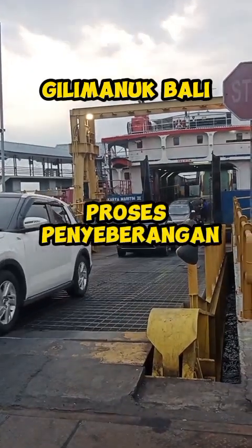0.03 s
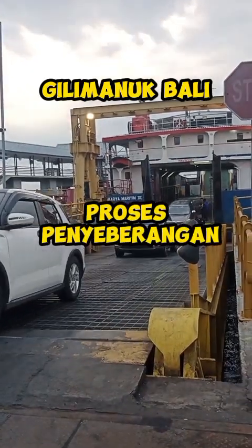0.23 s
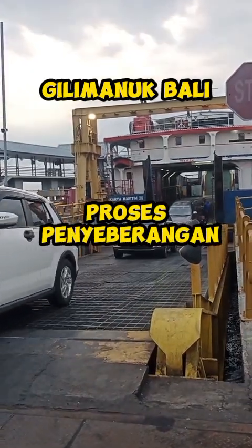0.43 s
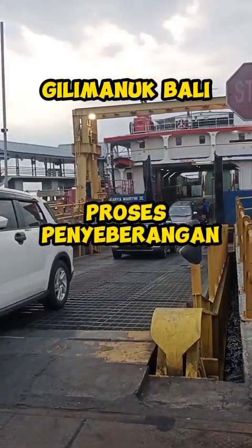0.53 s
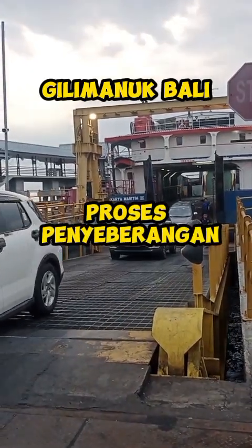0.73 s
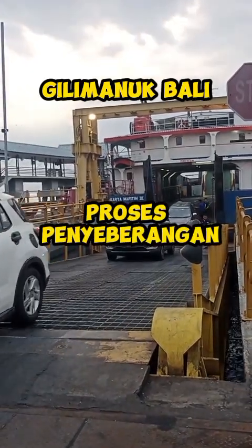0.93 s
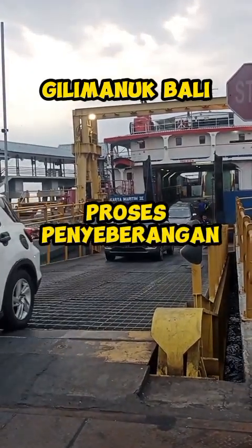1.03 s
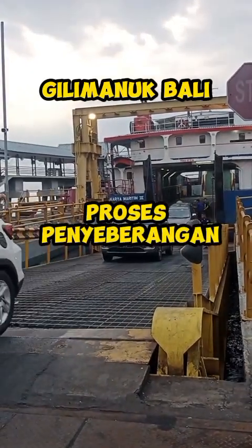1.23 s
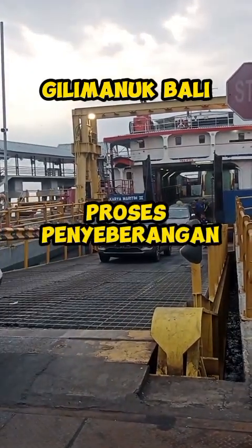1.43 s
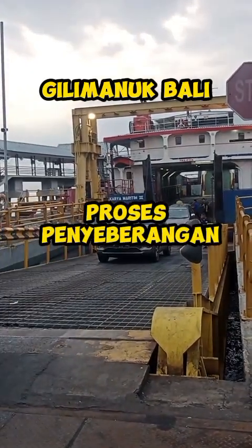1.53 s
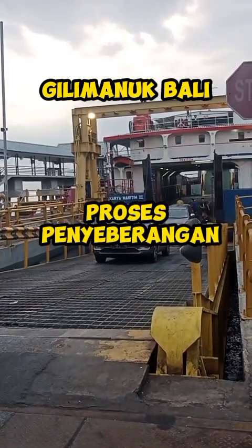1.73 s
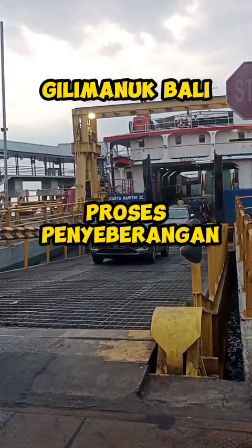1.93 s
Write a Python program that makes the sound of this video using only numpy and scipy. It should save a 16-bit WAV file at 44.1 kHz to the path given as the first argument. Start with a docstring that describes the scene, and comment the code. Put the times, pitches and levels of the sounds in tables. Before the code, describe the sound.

A car rolls slowly off a steel ramp close by, its tyres thumping over droning, rattling grating. At about 0.2 seconds, after a tiny rubber squeak, the front wheel slams a loose metal flap, which clatters and rings until about 0.6 seconds. The rear wheel slams it again from 1.3 to 1.6 seconds, then the last thumps pass. Engines rumble low throughout, with a few faint high tinkles.

```python
"""A car rolls slowly off a steel ferry ramp, over a low rumble of engines. From the start the deck
drones, its grating shivers, the loose end flap knocks under the load and the tyres thump over the bars.
Near 0.2 s rubber squeaks and the front wheel slams the flap, which clatters, rings, grinds on grit and
drops back. From 0.5 s there are faint, brief high tinkles. Near 1.3 s, after more squeaks, the rear
wheel slams the flap in turn, and its modes decay while the last thumps pass."""
import sys
import numpy as np
from scipy import signal
from scipy.io import wavfile

SR = 44100
rng = np.random.default_rng(int(sys.argv[2]) if len(sys.argv) > 2 else 0)


def to_wav(s):
    """Save 16-bit WAV."""
    ch = np.atleast_2d(s).T  # columns
    pcm = np.round(np.clip(ch, -1, 1) * 32767)  # PCM
    wavfile.write(sys.argv[1], SR, pcm.astype(np.int16))


N = 88200
TIME = np.arange(N) / SR

# Levels are relative to each source's gain. T60 is the time to decay by 60 dB.
# spectral density of the engines and far harbour: f/Hz, level/dB
RUMBLE_SPECTRUM = [(25, -33), (45, -38), (65, -15), (100, -12), (160, -6), (330, -10.5), (450, -26),
                   (750, -32.5), (1300, -30), (2000, -31.5), (2500, -24.5), (3500, -40.5), (4900, -47),
                   (6000, -65.5), (7200, -31), (8300, -49), (10000, -61), (15000, -60)]
# envelope of the deck's drone: t/s, level/dB
DRONE_ENVELOPE = [(0, -6.5), (.11, 3), (.3, 4.5), (.56, 1), (.72, -7.5), (.85, -5.5), (.9, -16), (.96, -15),
                  (1.04, -9), (1.09, -11.5), (1.13, -3), (1.26, -5.5), (1.6, 2), (1.72, -5.5), (1.85, -4),
                  (2, -14)]
# spectral density of that drone: f/Hz, level/dB
DRONE_SPECTRUM = [(50, -19), (110, -1), (230, -2), (340, -3),
                  (430, -12), (540, -16.5), (750, -33), (1500, -66)]
# envelope of the grating's vibration: t/s, level/dB
SHIVER_ENVELOPE = [(0, -2.5), (.11, -5.5), (.16, 11), (.3, 15.5), (.55, 3.5), (.62, -2), (.7, 2.5),
                   (.85, -2.5), (.93, -13.5), (1.09, -7), (1.16, -2.5), (1.27, 3), (1.6, -10),
                   (1.75, -15.5), (2, -9)]
# resonances of the grating: f/Hz, bandwidth/Hz, level/dB
GRATING_MODES = [(1076, 60, -4.5), (1207, 97, -1), (1335, 95, 3.5), (1766, 130, -2), (1893, 69, -0.5),
                 (2350, 270, 2.5), (2617, 98, -0.5), (2824, 220, -3), (3450, 200, -14), (5740, 280, -26.5),
                 (6740, 200, -17), (7230, 260, -12.5), (8030, 220, -18)]
# dull knocks as the flap takes up the load: t/s, level/dB
FLAP_KNOCKS = [(0.0, -28), (0.046, -25), (0.097, -29), (0.126, -30.5), (1.118, -47)]
# spectral density of a knock: f/Hz, level/dB
KNOCK_SPECTRUM = [(100, -19), (250, -6.5), (550, 5), (750, -28), (1200, -9), (2500, -21), (5000, -52)]
# blows of the slammed flap: t/s, level/dB, extra bass/dB, extra treble/dB
FLAP_BLOWS = [(0.179, -14.5, 0, -3.5), (0.187, -12.5, 1, -20), (0.203, -13.5, 7.5, -5), (0.222, -22, 2, 9),
              (0.236, -20.5, 12, 13), (0.261, -24.5, 6, 10.5), (0.328, -26.5, 17, 6.5),
              (0.355, -18.5, 3, 2), (0.378, -23, 12, 3), (0.397, -26.5, 15.5, -23), (0.424, -25, -6, -4),
              (0.446, -28, -14, 1), (1.289, -17, 0, -6), (1.299, -18.5, 7, 0), (1.328, -22.5, 15, 8),
              (1.352, -18, 7, 8.5), (1.359, -16, 4.5, 1), (1.377, -15.5, 5, -7), (1.392, -29, 9, -17),
              (1.449, -24.5, 0, 1), (1.458, -20, -7, -0.5), (1.469, -16.5, 3, 3.5), (1.481, -21, 2, 7),
              (1.510, -35.5, 25, -22), (1.539, -30, -5, 2)]
# time for a blow to spread through the plate: f/Hz, time constant/s
BLOW_RISE = [(200, 0.0017), (1000, 0.0021), (2800, 0.0012), (7000, 0.0021), (12000, 0.0027)]
# the quick crash of a blow, relative to the long ring: f/Hz, level/dB
CRASH_SPECTRUM = [(200, -8), (1200, 6.5), (3000, 4.5), (7000, 9), (12000, 1.5)]
# decay of that crash: f/Hz, T60/s
CRASH_DECAY = [(200, 0.3), (2500, 0.17), (7000, 0.15), (12000, .1)]
# spectral density of the plate's long, dense ring: f/Hz, level/dB
PLATE_SPECTRUM = [(60, -46), (130, -7.5), (260, -1.5), (480, 4), (720, -8.5), (1100, 2), (1500, -3.5),
                  (1850, 0.5), (2500, -4), (2900, -7.5), (3400, -12.5), (4200, -20), (4900, -26.5),
                  (6200, -25), (8200, -27), (10000, -20.5), (15000, -24.5)]
# decay of that ring: f/Hz, T60/s
PLATE_DECAY = [(100, 0.33), (450, 0.47), (1200, 0.52), (2600, 0.35), (4500, 0.23), (7500, 0.3),
               (11000, 0.061)]
# a tyre drops between two bars: t/s, level/dB
TYRE_DROPS = [(0.046, -23.5), (0.099, -19.5), (0.187, -21.5), (0.246, -22), (0.302, -25), (0.347, -22),
              (0.398, -14.5), (0.418, -21.5), (0.475, -22.5), (0.541, -16.5), (0.608, -24), (0.679, -21),
              (0.772, -25), (0.830, -21.5), (0.883, -32.5), (1.007, -25), (1.044, -31), (1.119, -20),
              (1.200, -22.5), (1.270, -20.5), (1.309, -37), (1.37, -21.5), (1.427, -22), (1.472, -18),
              (1.528, -20), (1.570, -18.5), (1.641, -40), (1.717, -20), (1.856, -24), (1.92, -33.5)]
# modes of tyre and deck: f/Hz, level/dB, T60/s
TYRE_MODES = [(70.2, -13.5, 0.3), (105.5, 4, 0.11), (126, -4.5, 0.12), (165.6, -18.5, 0.17),
              (209.2, -11.5, 0.13), (246, -9, 0.12), (337.6, -17, 0.27)]
# rubber slips on the bars before each slam: t/s, Gaussian width/s, f/Hz, level/dB
RUBBER_SLIPS = [(0.145, 0.0089, 1950, -31), (0.158, 0.01, 1600, -35.5), (1.170, 0.0077, 1900, -38),
                (1.229, 0.0041, 2590, -35.5), (1.267, 0.011, 1780, -36)]
# strong modes of the flap: f/Hz, level under front wheel/dB, level under rear wheel/dB, T60/s
FLAP_MODES = [(249.8, -14, -29.5, 0.37), (281.4, -22, -16, 0.63), (373.4, -13.5, -9, 0.38),
              (453, -10, -9, 0.42), (492, -9.5, -21, 0.3), (529.6, -27.5, -15, 0.49),
              (571.5, -11, -18, 0.64), (864, -14, -33, 0.18), (921, -12.5, -14, 0.32),
              (1080, -14.5, -22, .45), (1238, -7.5, -16, .45), (1391, -13.5, -21.5, 0.68),
              (1404, -13.5, -24, 0.73), (1634, -23, -17, 0.26), (1782, -9.5, -16, 0.23),
              (1798, -11.5, -9, 0.5), (1903, -14, -38, 0.27), (2270, -26, -19, 0.22),
              (2441, -9.5, -7, 0.24)]
# steel presses on gritty steel as the flap lands: t/s, Gaussian width/s, level/dB
GRIND_BURSTS = [(0.198, 0.0067, -33.5), (0.23, 0.013, -38.5), (0.26, 0.0042, -25), (0.377, .005, -34),
                (1.311, 0.01, -40), (1.361, .006, -31), (1.463, 0.0044, -47), (1.488, 0.0028, -42),
                (1.552, 0.018, -47)]
# modes of the steel edge: f/Hz, level/dB
EDGE_MODES = [(3300, -3), (3900, -13), (5700, -9), (6300, -0.5), (7300, 1.5), (7900, 0), (8400, -3.5),
              (9800, 2), (11000, 1.5), (11900, 2), (13200, 0), (15000, 0.5)]
# faint, brief tinkles near 3-4 kHz: t/s, f/Hz, level/dB
HIGH_TINKLES = [(0.510, 4310, -42.5), (0.930, 3710, -53), (1.100, 3850, -53.5), (1.130, 2966, -43.5),
                (1.235, 4000, -52), (1.820, 3860, -57), (1.945, 3640, -57.5)]


def from_db(db):
    """Amplitude ratio of a level in decibels."""
    return 10 ** (np.asarray(db) / 20)


def at_hz(points, hz):
    """Interpolation on a logarithmic frequency axis."""
    f, value = np.transpose(points)
    return np.interp(np.log(hz), np.log(f), value)


def in_time(points):
    """Linear interpolation of an envelope at every sample."""
    return np.interp(TIME, *np.transpose(points))


def flutter(rate):
    """Random modulation: unit normal values, rate per second, joined by straight lines."""
    return np.interp(TIME * rate, np.arange(2000), rng.standard_normal(2000))


def pulse(centre, width):
    """Gaussian envelope of unit height."""
    return np.exp(-.5 * ((TIME - centre) / width) ** 2)


def noise_bands():
    """White noise resolved into quarter octaves of equal spectral density: centre f/Hz, signal."""
    edges = 25 * 2 ** (np.arange(39) / 4)
    white = rng.standard_normal((2, N + SR // 2)) * np.sqrt(SR / 2)
    for k, (low, high) in enumerate(zip(edges, edges[1:])):
        sos = signal.butter(3, [low, high], "band", fs=SR, output="sos")
        yield np.sqrt(low * high), signal.sosfilt(sos, white[k % 2])[-N:]


def narrow_noise(hz, width):
    """Response of a resonance to random excitation, at unit rms."""
    sos = signal.butter(2, [hz - width / 2, hz + width / 2], "band", fs=SR, output="sos")
    x = signal.sosfilt(sos, rng.standard_normal(N + SR // 4))[-N:]
    return x / x.std()


def impulses(times, gains):
    """Impulsive excitation: one sample per event."""
    out = np.zeros(N)
    np.add.at(out, np.clip((times * SR).astype(int), 0, N - 1), gains)
    return out + 1e-18


def ring(x, hz, t60):
    """Damped oscillator: a unit impulse starts a decaying sine of unit amplitude."""
    r, w = from_db(-60 / (t60 * SR)), 2 * np.pi * hz / SR
    return signal.lfilter([0, np.sin(w)], [1, -2 * r * np.cos(w), r * r], x)


def die_away(energy, t60):
    """Exponential decay of stored energy, by 60 dB in t60."""
    return signal.lfilter([1], [1, -from_db(-120 / (t60 * SR))], energy)


def bass_share(hz, corner_hz=563):
    """Low shelf: the fraction of a blow's extra bass level that applies at hz."""
    return 1 / (1 + (hz / corner_hz) ** 4)


def engines(gain_db=-64, waver_db=6):
    """Amplitude-modulated noise: a low rumble and a thin hiss, each band wavering independently."""
    return sum(noise * from_db(gain_db + at_hz(RUMBLE_SPECTRUM, hz) + waver_db * flutter(rate=21))
               for hz, noise in noise_bands())


def deck_drone(gain_db=-54, waver_db=2.7):
    """Forced vibration: the rolling tyres drive the deck with low-frequency noise."""
    envelope = from_db(gain_db + in_time(DRONE_ENVELOPE) + waver_db * flutter(rate=45))
    return envelope * sum(noise * from_db(at_hz(DRONE_SPECTRUM, hz)) for hz, noise in noise_bands())


def grating_shiver(gain_db=-53, flicker_db=3, waver_db=1.8):
    """Resonance: random rolling contacts sustain the narrow bands of the grating."""
    modes = sum(narrow_noise(hz, width) * from_db(db + flicker_db * flutter(rate=21))
                for hz, width, db in GRATING_MODES)
    return modes * from_db(gain_db + in_time(SHIVER_ENVELOPE) + waver_db * flutter(rate=77))


def flap_clatter(plate_db=-37.5, rattle_db=1, knock_gain_db=-35, knock_t60=0.44, treble_hz=4300):
    """Modal overlap: knocks and blows store energy in plate modes so dense that they sound as noise."""
    knock_times, knock_db = np.transpose(FLAP_KNOCKS)
    knock_input = impulses(knock_times, from_db(knock_db + knock_gain_db - plate_db) ** 2)
    knock_energy = die_away(knock_input, knock_t60)
    times, db, bass_db, treble_db = np.transpose(FLAP_BLOWS)
    rattle = flutter(rate=260)
    out = 0
    for hz, noise in noise_bands():
        treble_share = 1 / (1 + (treble_hz / hz) ** 3)
        level = db + bass_share(hz) * bass_db + treble_share * treble_db + at_hz(PLATE_SPECTRUM, hz)
        blow_energy = impulses(times, from_db(level) ** 2)
        knocks = from_db(at_hz(KNOCK_SPECTRUM, hz)) ** 2 * knock_energy
        crash = from_db(at_hz(CRASH_SPECTRUM, hz)) ** 2 * die_away(blow_energy, at_hz(CRASH_DECAY, hz))
        long_ring = die_away(blow_energy, at_hz(PLATE_DECAY, hz))
        amplitude = np.sqrt(knocks + crash + long_ring)  # incoherent energies add
        lag = np.exp(-1 / (at_hz(BLOW_RISE, hz) * SR))
        out += noise * signal.lfilter([1 - lag], [1, -lag], amplitude)
    return out * from_db(plate_db + rattle_db * rattle)


def tyre_thumps(gain_db=7.5, rise_s=.014, spread_db=1, pitch_spread=.025):
    """Compliant impact: soft rubber blows build up gradually in the damped modes of tyre and deck."""
    out = np.zeros(N)
    for start, db in TYRE_DROPS:
        age = np.maximum(TIME - start, 0)
        rise = 1 - np.exp(-(age / rise_s) ** 2)
        for hz, mode_db, t60 in TYRE_MODES:
            detune, strength = rng.standard_normal(2)
            decay = from_db(-60 * age / t60)
            tone = np.sin(2 * np.pi * hz * (1 + pitch_spread * detune) * age)
            out += from_db(db + mode_db + spread_db * strength) * rise * decay * tone
    return from_db(gain_db) * out


def rubber_squeaks(pitch_waver=.028):
    """Frictional oscillation: slipping rubber gives brief tones, roughened by frequency modulation."""
    out = 0
    for centre, width, hz, db in RUBBER_SLIPS:
        pitch = hz * (1 + pitch_waver * flutter(rate=400))
        phase = 2 * np.pi * np.cumsum(pitch) / SR
        out += from_db(db) * pulse(centre, width) * np.sin(phase)
    return out


def flap_ring(gain_db=-2, rear_wheel_from_s=1.0):
    """Modal superposition: the blows ring the flap's strong modes, which each wheel loads its own way."""
    times, db, bass_db, _ = np.transpose(FLAP_BLOWS)
    out = 0
    for hz, front_db, rear_db, t60 in FLAP_MODES:
        polarity = np.sign(rng.standard_normal((len(times), 2))[:, 0])
        wheel_db = np.where(times < rear_wheel_from_s, front_db, rear_db)
        level = db + wheel_db + bass_share(hz) * bass_db
        out += ring(impulses(times, polarity * from_db(level)), hz, t60)
    return from_db(gain_db) * out


def grit_grinding(gain_db=-11, contacts_per_s=9000, spread_db=3, t60_cycles=450):
    """Shot noise: tiny uneven contacts, pressed in bursts, excite high modes of the steel edge."""
    pressure = sum(from_db(db) * pulse(centre, width) for centre, width, db in GRIND_BURSTS)
    out = 0
    for hz, db in EDGE_MODES:
        contacts = rng.random(N) < contacts_per_s / len(EDGE_MODES) / SR
        strengths = rng.choice([-1, 1], N) * from_db(spread_db * rng.standard_normal(N))
        out += from_db(db) * ring(contacts * strengths * pressure + 1e-18, hz, t60_cycles / hz)
    return from_db(gain_db) * out


def faint_tinkles(t60=0.11, gap_s=0.013, fade_db=2, pitch_spread=.04):
    """Damped oscillation: each tinkle is three quick, fading pings at slightly different pitches."""
    out = 0
    for start, hz, db in HIGH_TINKLES:
        for ping, detune in enumerate(rng.standard_normal(3)):
            onset = impulses(np.array([start + ping * gap_s]), from_db(db - fade_db * ping))
            out += ring(onset, hz * (1 + pitch_spread * detune), t60)
    return out


def scene():
    """Linear superposition of all sources at one point beside the ramp."""
    flap = flap_clatter() + flap_ring() + grit_grinding()
    rolling = tyre_thumps() + deck_drone() + grating_shiver() + rubber_squeaks()
    return (flap + rolling + faint_tinkles() + engines())[None]


def record(dry, dip_hz=4680, dip_db=-15, edge_hz=8596, top_db=-17, cutoff_hz=15600):
    """Saturation and filtering: peaks are rounded; the microphone has a dip and a dull, cut-off top."""
    rounded = 1.054 * np.tanh(dry / 1.154)
    notched = signal.lfilter(*signal.iirnotch(dip_hz, Q=2.45, fs=SR), rounded)
    dipped = from_db(dip_db) * rounded + (1 - from_db(dip_db)) * notched
    below, above = (signal.sosfilt(signal.cheby1(10, .5, edge_hz, kind, fs=SR, output="sos"), dipped)
                    for kind in ("low", "high"))
    lowpass = signal.ellip(12, .1, 90, cutoff_hz, fs=SR, output="sos")
    return signal.sosfilt(lowpass, below + from_db(top_db) * above)


dry = scene()
out = record(dry)
to_wav(out)
```